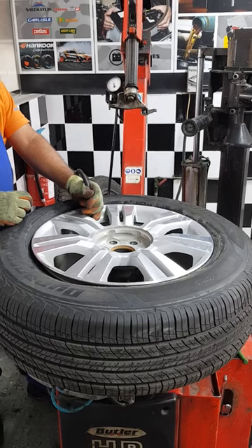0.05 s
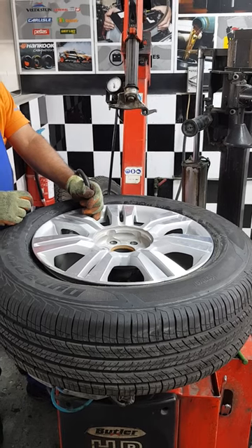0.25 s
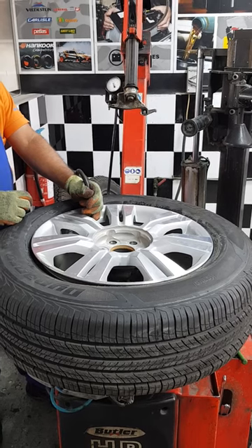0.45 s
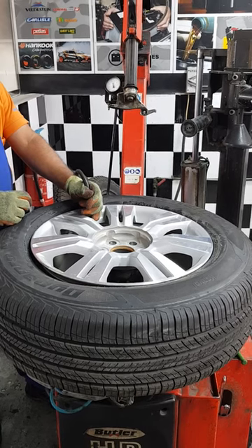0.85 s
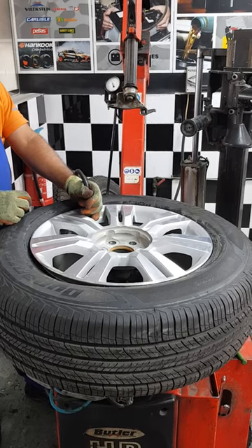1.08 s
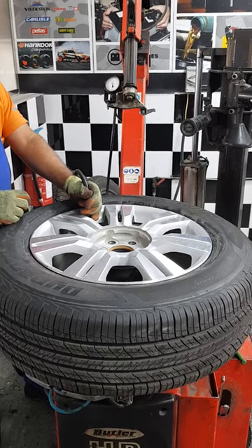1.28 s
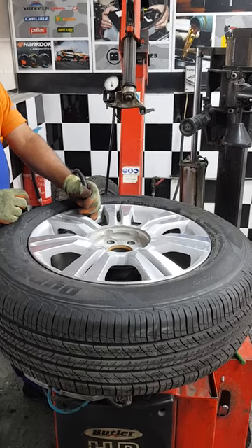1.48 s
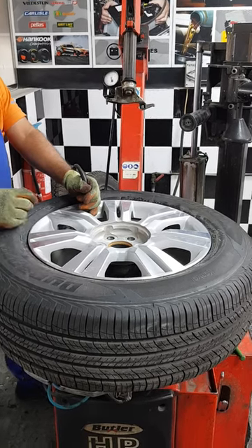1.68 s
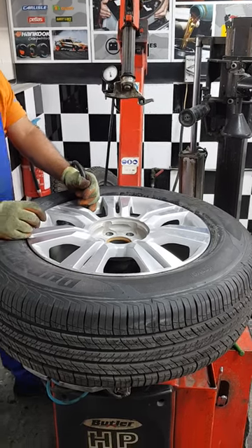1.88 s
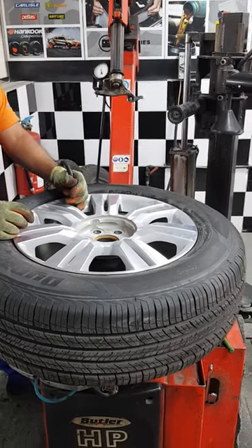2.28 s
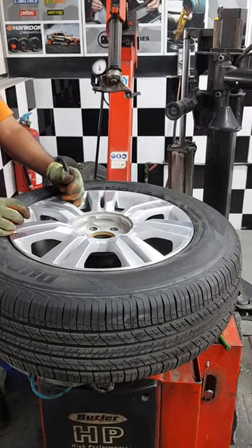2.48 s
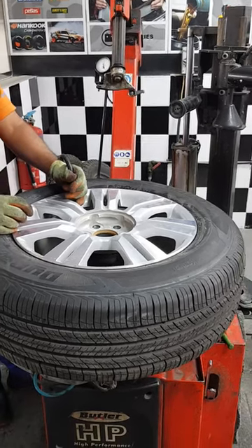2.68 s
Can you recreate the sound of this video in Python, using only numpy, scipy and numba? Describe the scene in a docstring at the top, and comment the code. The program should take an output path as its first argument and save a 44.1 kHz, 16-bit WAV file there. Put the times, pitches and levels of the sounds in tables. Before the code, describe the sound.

A tyre inflates with a steady hiss, banging twice as its beads seat on the rim.

```python
"""A hard-walled workshop: a tyre is inflated on a changing machine.
Air hisses through the valve over a knocking piston compressor. The two beads jump onto the rim in turn,
each with a bang that rings the wheel and the room. Air gushes past the lower bead; the upper one creaks,
then sticks and slips. A limiter ducks at the first bang, holds, and is letting go at the second."""
import sys
import numpy as np
from scipy import signal
from scipy.fft import rfft, irfft
from scipy.io import wavfile
from scipy.ndimage import uniform_filter1d
from numba import njit

SR = 44100
rng = np.random.default_rng(int(sys.argv[2]) if len(sys.argv) > 2 else 0)


def store_pcm(level_fs):
    """Save levels as 16-bit WAV."""
    pcm = np.round(np.clip(level_fs, -1, 1) * 32767).astype(np.int16)
    wavfile.write(sys.argv[1], SR, np.atleast_2d(pcm).T)


N = 125685
ROOM_T60_S, ROOM_TREBLE_T60_S, ROOM_BUILD_S, ROOM_SPLIT_HZ = 0.48, 0.41, 0.0037, 1250

# Bead slaps on the rim. Each row: start in seconds, crack level in relative dB, crack T60 in seconds,
# thump pitch in Hz, thump level in relative dB, thump T60 in seconds.
LOWER_SLAPS = [(1.1122, 11.5, 0.061, 599, -3, 0.09), (1.1228, -1, 0.051, 310, -14, 0.11),
               (1.1285, -1, .06, 974, -6, 0.043), (1.14, -1, .04, 1230, -18, 0.02),
               (1.159, -5, 0.026, 930, -11, 0.014), (1.184, -6, 0.025, 815, -19, 0.013),
               (1.199, -9, 0.047, 760, -19, .05)]
UPPER_SLAPS = [(2.4595, 4, .06, 456, -3, 0.029), (2.465, 6.5, 0.029, 1090, -5.5, 0.03),
               (2.472, 0, .05, 333, -6.5, 0.061), (2.487, -15, 0.024, 338, -17, 0.059),
               (2.518, -6, 0.034, 410, -20, 0.023)]
# Bang spectra. Each row: frequency in Hz, relative density in dB.
LOWER_SPECTRUM = [(40, -58), (100, -23), (185, -13.5), (284, -13.5), (400, -12), (530, -7), (643, -3),
                  (784, -7.5), (1230, -6.5), (1780, -16.5), (2850, -15), (4340, -28), (7680, -26.5),
                  (15000, -45)]
UPPER_SPECTRUM = [(30, -46), (70, -13), (164, -16), (225, -20), (338, -4), (500, -11), (728, -10),
                  (910, -13.5), (1320, -10), (1870, -13), (2710, -14.5), (3500, -18.5), (4400, -28),
                  (7500, -29.5), (15000, -53.5)]
# Each row: frequency in Hz, T60 in seconds, level in dB from the lower bead, same from the upper.
WHEEL_MODES = [(270, 1, -16.5, -15), (287.7, 0.85, -20, -10.5), (318.4, 0.27, -2, 3),
               (370, 0.57, -27, -9.5), (445, 0.55, -8, -6.5), (544.4, 0.47, -6, -10), (649, 0.24, -2.5, -3),
               (721, 0.46, -4, -4), (990, 0.3, -1, -22), (1206, 0.24, 6, 3), (1497, 0.087, 3, 2),
               (3400, .2, -29, -25)]

def bead_bang(slaps, spectrum, thump_db, room_db, treble_db, bead):
    """A bead (0 lower, 1 upper) slaps home in steps; wheel and room ring, the room's treble dying first."""
    start, tone = slaps[0][0], colour(spectrum)
    crack_power = sum((undb(db) * burst(s, t60, attack=0.0005)) ** 2 for s, db, t60, *_ in slaps)
    crack = np.sqrt(crack_power) * noise(tone, NEAR_WIDTH)
    thumps = undb(thump_db) * sum(sidewall_thump(s, hz, db, t60) for s, _, _, hz, db, t60 in slaps)
    ring = 0
    for hz, t60, *levels_db in WHEEL_MODES:
        phase = 2 * np.pi * hz * (seconds() - start) + rng.uniform(0, 2 * np.pi) + 0.096 * walk(38)
        phase = phase + stereo_phase(hz)
        envelope = burst(start, t60, attack=0.0096) * (1 + 0.25 * walk(29))
        ring = ring + undb(levels_db[bead]) * envelope * np.sin(phase)
    wash = noise(tone, NEAR_WIDTH)
    low = lowpass(wash, ROOM_SPLIT_HZ)
    room_body = undb(room_db) * low * burst(start, ROOM_T60_S, attack=ROOM_BUILD_S)
    room_treble = undb(treble_db) * (wash - low) * burst(start, ROOM_TREBLE_T60_S, attack=ROOM_BUILD_S)
    crackle = undb(3 * walk(280))
    return crack * crackle + thumps + ring + room_body + room_treble

def sidewall_thump(start, hz, db, t60):
    """The taut sidewall pops; the pitch starts sharp and sags as it settles."""
    sharp, sag_s = 0.1, 0.0057
    age = np.maximum(seconds() - start, 0)
    cycles = hz * (age + sharp * sag_s * (1 - np.exp(-age / sag_s)))
    return -undb(db) * burst(start, t60, attack=0.0005) * np.sin(2 * np.pi * cycles)

# Each row: start in seconds, hold in seconds, pitch in Hz, glide in Hz per second, level in dB.
SQUAWKS = [(2.498, .01, 896, 2, -2), (2.499, 0.028, 1283, -1800, -6), (2.515, 0.029, 1101, -1800, -6.5),
           (2.525, 0.027, 726, -400, -3.5), (2.534, 0.0091, 1500, 0, -8)]

def bead_slip():
    """The upper bead sticks and slips over the rim: rough squawks, most falling, linger in the room."""
    t, out = seconds(), 0
    for start, hold, hz, glide, db in SQUAWKS:
        pitch_hz = (hz + glide * np.clip(t - start, 0, hold)) * (1 + 0.05 * walk(192))
        phase = 2 * np.pi * np.cumsum(pitch_hz) / SR + stereo_phase(hz)
        roughness = undb(2 * walk(240))
        direct = burst(start, t60=0.034, hold=hold, attack=0.0014) * roughness * np.sin(phase)
        echo = burst(start, ROOM_T60_S, hold, attack=hold) * noise(resonance(hz, 70) ** 2, DIFFUSE_WIDTH)
        out = out + undb(db) * (direct + undb(-15) * echo)
    return out

def bead_creak():
    """Stretched rubber squeaks faintly on the rim, rising a little as the pressure builds."""
    start_s, base_hz, rise_hz_per_s = 2.33, 880, 157
    pitch_hz = (base_hz + rise_hz_per_s * (seconds() - start_s)) * (1 + 0.0086 * walk(120))
    phase = 2 * np.pi * np.cumsum(pitch_hz) / SR
    tone = undb(-28) * np.sin(phase) + undb(-35) * np.sin(2 * phase)
    return burst(start_s, t60=0.16, hold=0.063, attack=0.037) * tone

# Piston strokes, about eight a second. Each row: start in seconds, relative level in dB.
STROKES = [(0.071, 0), (0.196, 1.5), (0.323, 1.5), (0.451, 1), (0.573, 0.5), (0.7, -0.5), (.826, -2),
           (0.954, 0.5), (1.076, -0.5), (1.2, -4), (1.328, 0), (1.453, -3), (1.579, -1.5), (1.706, -2),
           (1.832, -1.5), (1.958, -0.5), (2.084, -3), (2.205, 0), (2.332, -1), (2.457, 19.5), (2.584, -9),
           (2.711, 1), (2.834, 1.5)]
# Each row: frequency in Hz, relative density in dB.
KNOCK_SPECTRUM = [(150, -39), (370, 2), (600, -4), (1050, -1.5), (1600, -4), (2600, -11.5), (4500, -18.5),
                  (9000, -25.5), (15000, -28)]
DIN_SPECTRUM = [(30, -11), (60, -17.5), (100, -11), (140, -16.5), (180, -12.5), (260, -15.5), (355, -4.5),
                (405, -9.5), (460, -6), (570, -14.5), (640, -8), (830, -11.5), (1140, -10.5), (1870, -15.5),
                (2150, -17), (2690, -19.5), (5000, -25.5), (6500, -64)]

def compressor():
    """Each piston stroke knocks and echoes, and the valve plate claps shut after it, over a steady din."""
    t, rebound_s = seconds(), 0.0337
    starts, levels_db = np.array(STROKES).T
    gains = undb(levels_db)
    direct = sum(g * burst(s, t60=0.094, hold=0.012, attack=0.002) for s, g in zip(starts, gains))
    tails = sum(g * burst(s, ROOM_T60_S, attack=ROOM_BUILD_S) for s, g in zip(starts, gains))
    rebound = undb(-6) * np.interp(t - rebound_s, t, direct, left=0)
    knocks = (direct + rebound) * noise(colour(KNOCK_SPECTRUM), DIFFUSE_WIDTH)
    echo = undb(-10) * tails * noise(colour(KNOCK_SPECTRUM), DIFFUSE_WIDTH)
    tones = compressor_hum() + pump(starts, gains)
    din = undb(-30.5 + 1.7 * walk(55)) * noise(colour(DIN_SPECTRUM), DIFFUSE_WIDTH)
    return undb(-26) * (knocks + echo) + tones + din

# Each row: frequency in Hz, attack in seconds, T60 in seconds, relative level in dB.
PUMP_MODES = [(360, .018, 0.15, -24), (985, 0.0027, 0.061, -21.5), (1045, 0.002, 0.087, -26.5),
              (1150, 0.0028, 0.088, -25), (1290, 0.0035, 0.076, -25)]

def pump(starts, gains):
    """Every stroke rings the pump with a hollow beat; a rough whine runs on."""
    t, rings = seconds(), 0
    for hz, attack, t60, db in PUMP_MODES:
        carrier = np.exp(1j * (2 * np.pi * hz * t + stereo_phase(hz)))
        hits = np.zeros(N, complex)
        hits[(starts * SR).astype(int)] = gains * np.exp(2j * np.pi * rng.random(len(starts)))
        envelope = signal.fftconvolve(hits, burst(0, t60, attack=attack))[:N]
        rings = rings + undb(db) * np.imag(envelope * carrier)
    whine = undb(-44) * noise(resonance(hz=2147, width_hz=200) ** 2, NEAR_WIDTH)
    return rings + whine

# Each row: frequency in Hz, relative level in dB.
HUM_TONES = [(362, -41.5), (449.2, -41.5), (474, -37), (545, -47), (653, -45), (984, -46), (1036, -45),
             (1137, -41.5), (1260, -58), (1405, -43), (1513, -47), (1720, -45.5), (1750, -50), (2070, -50),
             (2140, -56), (2115, -39.5), (2546, -47.5)]

def compressor_hum():
    """The compressor's running tones waver in level and phase."""
    t, hum, waver = seconds(), 0, 0.28
    for hz, db in HUM_TONES:
        phase = 2 * np.pi * hz * t + min(hz / 3000, 1) * rng.uniform(-1.5, 1, (2, 1))
        tone = (1 + waver * walk(7.7)) * np.sin(phase) + waver * walk(11) * np.cos(phase)
        hum = hum + undb(db + 1) * tone
    return hum

# Each row: frequency in Hz, relative density in dB.
HISS_SPECTRUM = [(1000, 2.5), (2500, 2), (4500, -2.5), (6000, -3), (7800, -2.5), (9000, -6), (10400, -7),
                 (12000, -12), (15500, -13.5)]
# Thin tonal peaks in the hiss; those at 7440 and 10200 Hz are valve whistles.
# Each row: centre in Hz, width in Hz, relative level in dB.
HISS_PEAKS = [(3160, 160, -2), (7440, 36, 1), (8350, 90, -1), (10200, 70, -2.5), (14300, 150, -12)]

def valve_air():
    """Air hisses through the valve; the hiss flutters and has thin tonal peaks."""
    bass_rolloff = np.minimum(freqs() / 1000, 1) ** 2
    hiss = noise(colour(HISS_SPECTRUM) * bass_rolloff, DIFFUSE_WIDTH)
    peaks = noise(sum(undb(db) * resonance(hz, width) for hz, width, db in HISS_PEAKS), DIFFUSE_WIDTH)
    flutter = undb(1.4 * walk(30))
    return (undb(-34.5) * hiss + undb(-44.5) * peaks) * flutter

def air_gush():
    """Air rushes past the lower bead until it seals."""
    envelope = burst(start=1.112, t60=0.4, hold=0.06, attack=0.0055)
    return undb(-7) * envelope * noise(colour(HISS_SPECTRUM), DIFFUSE_WIDTH)

# Each row: start in seconds, level in dB.
BUMPS = [(0.441, -31.5), (2.0, -26), (2.195, -27)]

def tyre_bumps():
    """The tyre bumps softly on the machine."""
    envelope = sum(undb(db) * burst(s, t60=0.24, attack=0.0028) for s, db in BUMPS)
    return envelope * noise(resonance(hz=107, width_hz=130) ** 2, NEAR_WIDTH)

def room_rumble():
    """A low, diffuse rumble fills the workshop."""
    return undb(-49 + 2 * walk(3.1)) * noise(resonance(hz=110, width_hz=140) ** 2, DIFFUSE_WIDTH)

# Stereo width of sound from all around and from nearby. Each row: frequency in Hz, side minus mid in dB.
DIFFUSE_WIDTH = [(60, -5), (200, -8.5), (380, -10), (700, -3.5), (1300, -2.5), (2400, 2), (15000, -1.5)]
NEAR_WIDTH = [(60, -5), (200, -12), (380, -14), (700, -4.5), (1300, -4), (2400, -0.5), (15000, -2)]

def noise(gain, width):
    """Stereo noise of rms 1 with a given spectrum and width."""
    mid, side = rfft(rng.standard_normal((2, N))) * gain
    side = side * colour(width)
    return unit_rms(irfft(np.array([mid + side, mid - side]), N))

def stereo_phase(hz):
    """Opposite left and right phase offsets in radians."""
    return min(hz / 2000, 1) * np.array([[1], [-1]]) * rng.choice([-1, 1])

def burst(start, t60, hold=0, attack=0.0021):
    """Linear attack, hold and exponential decay; times in seconds."""
    age = seconds() - start
    return np.clip(age / attack, 0, 1) * np.exp(-np.log(1000) * np.maximum(age - hold, 0) / t60)

def walk(rate_hz):
    """Smooth random drift of rms 1."""
    return unit_rms(lowpass(rng.standard_normal(N), rate_hz))

def colour(points):
    """Gain per frequency from (Hz, dB) points."""
    hz, db = np.array(points, float).T
    return undb(np.interp(np.log(freqs()), np.log(hz), db))

def resonance(hz, width_hz):
    """Response of one resonance, gain 1 at its centre."""
    return 1 / (1 + 1j * (freqs() ** 2 - hz ** 2) / (freqs() * width_hz))

def lowpass(x, hz):
    return irfft(rfft(x) / (1 + (freqs() / hz) ** 4), N)

def undb(db):
    return 10 ** (np.asarray(db) / 20)

def unit_rms(x):
    return x / np.sqrt(np.mean(x ** 2))

def seconds():
    return np.arange(N) / SR

def freqs():
    return np.maximum(np.arange(N // 2 + 1) * SR / N, 1)

# Swell of compressor and valve air together. Each row: time in seconds, gain in dB.
SWELL = [(0, -5.5), (.13, -2), (.42, -0.5), (.7, 1.5), (1.1, 2.5), (2.85, 0)]

def scene():
    """Two beads seat over the running compressor and air."""
    swell = undb(np.interp(seconds(), *np.array(SWELL).T))
    lower = bead_bang(LOWER_SLAPS, LOWER_SPECTRUM, thump_db=17, room_db=7.5, treble_db=2.5, bead=0)
    upper = bead_bang(UPPER_SLAPS, UPPER_SPECTRUM, thump_db=15.5, room_db=3.5, treble_db=1.5, bead=1)
    background = swell * (compressor() + valve_air()) + room_rumble() + tyre_bumps()
    return background + lower + air_gush() + bead_creak() + upper + bead_slip()

@njit
def duck(over_db, hold_samples, release_db_per_sample):
    """Gain reduction in dB: down at once, held, then let go at a steady rate."""
    out, cut, wait = np.zeros(len(over_db)), 0., 0.
    for i in range(len(over_db)):
        if over_db[i] > cut:
            cut, wait = over_db[i], hold_samples
        elif wait > 0:
            wait -= 1
        else:
            cut = max(cut - release_db_per_sample, 0.)
        out[i] = cut
    return out

def record(dry):
    """A look-ahead limiter with a long hold; bass is thinned, peaks are rounded, the top is cut off."""
    limit_db, hold_s, release_db_per_s = -9.5, 0.93, 14.5
    bass_cut_hz, top_hz = 75, 15750
    power = uniform_filter1d(np.mean(dry ** 2, axis=0), size=441, origin=115)
    over_db = 10 * np.log10(np.maximum(power, 1e-12)) - limit_db
    limited = dry * undb(-duck(over_db, hold_s * SR, release_db_per_s / SR))
    thinned = signal.sosfilt(signal.butter(2, bass_cut_hz, "high", fs=SR, output="sos"), limited)
    rounded = thinned / (1 + thinned ** 4) ** .25
    return signal.sosfilt(signal.ellip(8, .2, 70, top_hz, fs=SR, output="sos"), rounded)

dry = scene()
out = record(dry)
store_pcm(out)
```